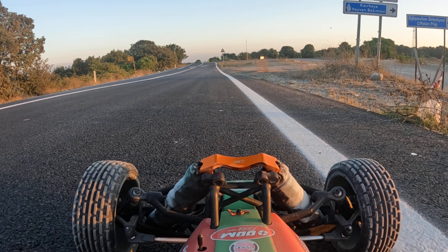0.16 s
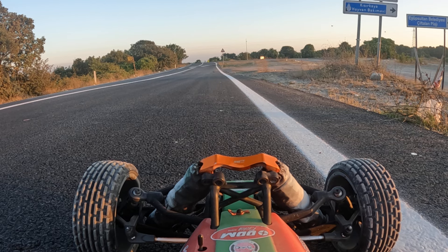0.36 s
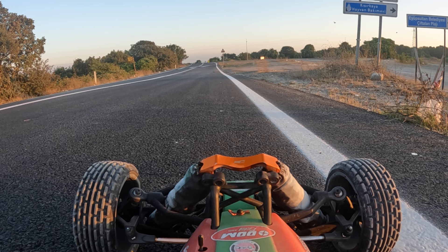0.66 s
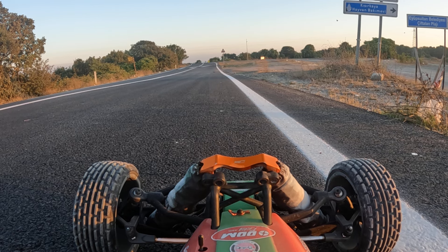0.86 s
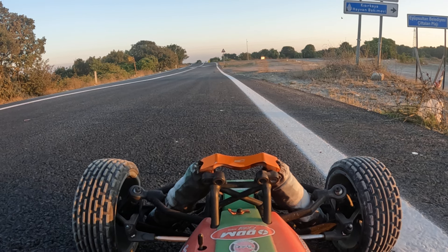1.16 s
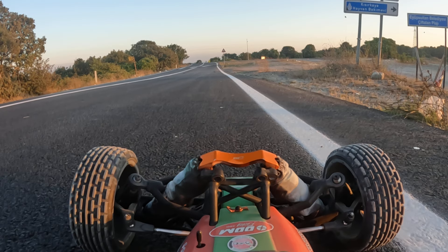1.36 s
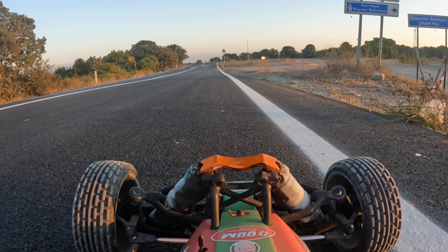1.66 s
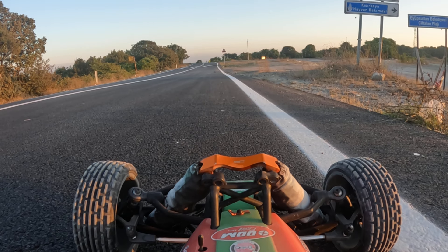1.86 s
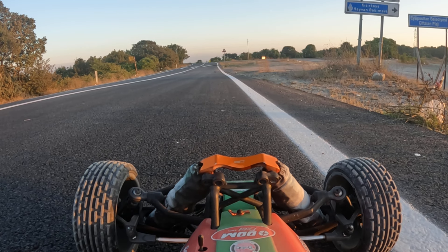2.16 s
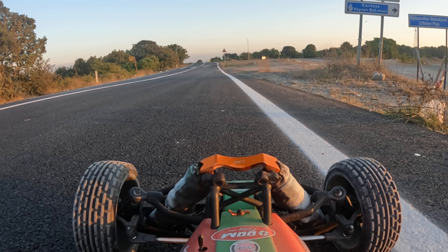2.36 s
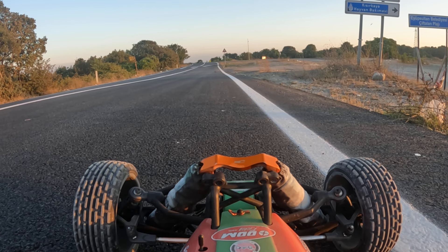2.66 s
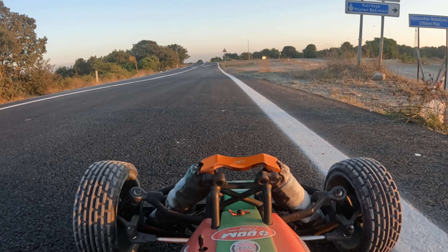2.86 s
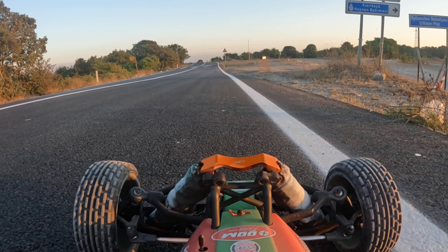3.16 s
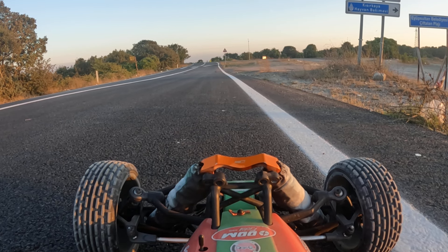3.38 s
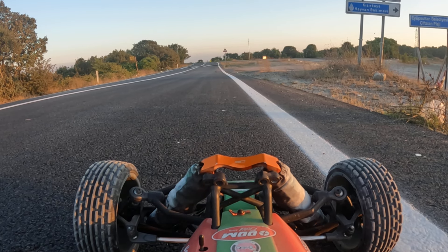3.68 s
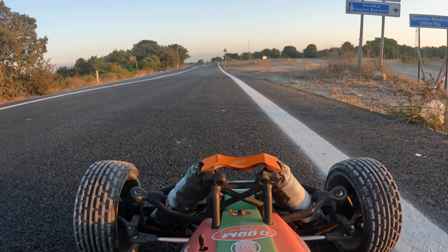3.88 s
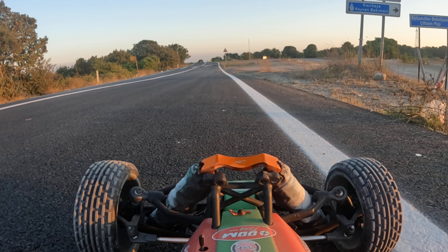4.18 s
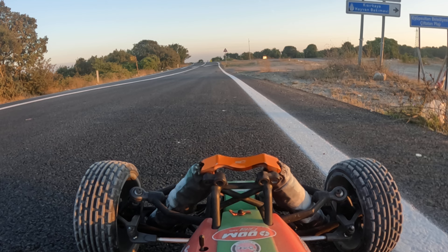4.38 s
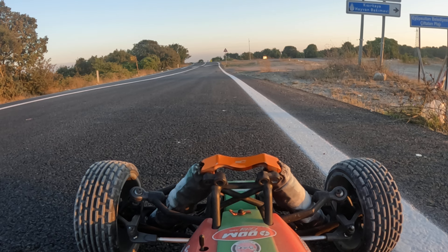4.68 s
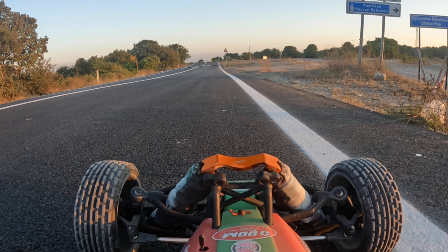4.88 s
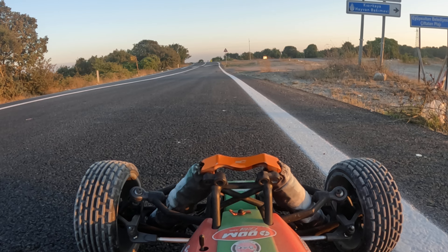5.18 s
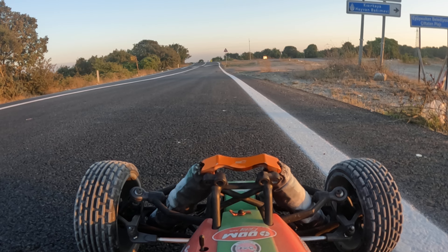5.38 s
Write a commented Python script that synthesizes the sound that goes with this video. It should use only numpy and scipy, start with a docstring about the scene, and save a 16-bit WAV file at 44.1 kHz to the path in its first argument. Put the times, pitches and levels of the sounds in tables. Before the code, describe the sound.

After a few servo twitches, a cord pull starts a small two-stroke engine, which putters unevenly and gives two short revs.

```python
"""Pull-starting a model buggy

A large model buggy on a country road, heard from its chassis over faint far traffic. The steering servo
twitches, tugs on the starter cord jolt the chassis, and one hard pull starts the small two-stroke.
Exhaust puffs drive the silencer and combustion rattles the casing. The engine gathers speed, settles
into a burbling idle that fires every second turn, and twice runs up briefly, clutch shoes scraping."""
import sys
import numpy as np
from scipy import signal
from scipy.fft import rfft, irfft, next_fast_len
from scipy.io import wavfile
from scipy.ndimage import map_coordinates

SR = 44100
rng = np.random.default_rng(int(sys.argv[2]) if len(sys.argv) > 2 else 0)


def generate_wav(sig):
    """Save sig (samples, or channels by samples) to the path in sys.argv[1] as 16-bit PCM at SR."""
    pcm = np.round(np.clip(np.atleast_2d(sig).T, -1, 1) * 32767).astype(np.int16)
    wavfile.write(sys.argv[1], SR, pcm)


N = 243917

# chassis flex spectrum: f/Hz, level/dB
FLEX = [(20, 3), (35, 1.5), (60, 8.5), (90, 9.5), (150, -0.5), (300, -3.5), (700, -58.5)]
# carburettor air spectrum: f/Hz, level/dB
HISS = [(3000, -22), (4500, -5), (5200, -4), (5500, 2), (6100, -4), (6900, -11), (7600, -9), (9000, -21),
        (14000, -45)]
# throttle openings: t/s, length/s
BLIPS = [(4.289, 0.41), (5.329, 0.3)]


def amp(db):
    """Decibels to gain."""
    return 10 ** (np.asarray(db) / 20)


def unit(x):
    """Scale to rms 1."""
    return x / np.sqrt(np.mean(x ** 2) + 1e-20)


def noise():
    """White noise."""
    return rng.standard_normal(N)


def curve(rows):
    """Interpolate (t/s, value) rows to one value per sample."""
    return np.interp(np.arange(N) / SR, *np.transpose(rows))


def coloured(x, spectrum):
    """Minimum-phase filter from (f/Hz, level/dB) rows, steep past the last row."""
    size = 2 * next_fast_len(N // 2 + SR // 4)
    last_hz, last_db = spectrum[-1]
    hz, db = np.transpose([*spectrum, (4 * last_hz, last_db - 80)])
    gain = amp(np.interp(np.log(np.fft.rfftfreq(size, 1 / SR) + 1), np.log(hz), db))
    cepstrum = irfft(np.log(gain + 1e-6))
    cepstrum[1:size // 2] *= 2
    cepstrum[size // 2 + 1:] = 0
    return irfft(rfft(x, size) * np.exp(rfft(cepstrum)))[:N]


def shaped(x, spectrum):
    """Filter to a spectrum, at rms 1."""
    return unit(coloured(x, spectrum))


def impulses(times, sizes):
    """One spike at each time."""
    at = np.clip(np.round(times * SR).astype(int), 0, N)
    return np.bincount(at, sizes, N + 1)[:N]


def bursts(times, sizes, decay_s, rise_s=0.0047):
    """Envelope that swells and decays at each time."""
    decay = signal.lfilter([1], [1, -np.exp(-1 / (decay_s * SR))], impulses(times, sizes))
    pole = np.exp(-1 / (rise_s * SR))
    return signal.lfilter([1 - pole], [1, -pole], decay)


def held(start_s, length_s, attack_s, release_s):
    """Envelope, 0-1: ramp, hold until length_s, decay."""
    t = np.arange(N) / SR - start_s
    return np.clip(t / attack_s, 0, 1) * np.exp(-np.maximum(t - length_s, 0) / release_s)


def add(track, start_s, sound):
    """Mix a sound into the track."""
    part = track[round(start_s * SR):][:len(sound)]
    part += sound[:len(part)]


def contacts(rows, ring_db, crack_db, length_s, release_s, damping, attack_s=0.0011, scatter_db=2):
    """Each contact chatters briefly and rings the chassis modes at random strengths."""
    # chassis and housing modes: f/Hz, level/dB, t60/s
    housing_modes = [(243, -18, .06), (656, -8, 0.12), (850, -10, 0.21), (1000, 2, 0.034),
                     (1143, 8.5, 0.044), (1305, 1, 0.06), (1343, -8.5, 0.058), (1710, -13, 0.065),
                     (2170, -16.5, 0.049), (2530, -21, 0.036), (3100, -24, .035), (3450, -18, 0.057),
                     (4670, -40, .04), (5350, -39.5, 0.036)]
    # chatter: f/Hz, level/dB
    crack_spectrum = [(200, -5), (650, -6.5), (780, -19.5), (1130, 8), (1330, 10.5), (1500, -28.5),
                      (2200, -18), (2800, -27.5), (3450, -19), (3800, -45), (4600, -35.5), (6000, -44),
                      (10000, -76)]
    t = np.arange(SR // 5) / SR
    hz, level_db, t60_s = np.transpose(housing_modes)[:, :, None]
    decay = 1000 ** (-damping * t / t60_s)
    onset = 1 - np.exp(-(t / attack_s) ** 2)
    rings, chatter = np.zeros(N), np.zeros(N)
    for start_s, db in rows:
        size, detune, phase = rng.standard_normal((3, len(housing_modes), 1))
        tones = np.sin(2 * np.pi * (hz * (1 + 0.0029 * detune) * t + phase))
        modes = amp(level_db + scatter_db * size) * decay * tones
        add(rings, start_s, amp(db + ring_db) * modes.sum(0) * onset)
        chatter += amp(db + crack_db) * held(start_s, length_s, attack_s, release_s)
    return rings + np.sqrt(np.mean(chatter ** 2)) * shaped(chatter * noise(), crack_spectrum)


def traffic(level_db=-50):
    """Faint rush of far traffic."""
    # f/Hz, level/dB
    rush_spectrum = [(15, -34), (25, 5), (65, -0.5), (502, 1), (650, -16.5), (842, 7), (1140, 5.5),
                     (1320, -5), (1790, -15.5), (1950, -19), (2180, -18), (2700, -23), (2940, -26),
                     (3150, -17.5), (3420, -17), (3750, -30.5), (4340, -33), (5640, -37), (7500, -45.5),
                     (9550, -74.5)]
    return amp(level_db) * shaped(noise(), rush_spectrum)


def servo():
    """Each twitch of the steering servo is a short buzz of its gears."""
    # t/s, level/dB
    twitches = [(0.1686, -24), (0.1775, -28), (0.1881, -29.5), (0.2798, -27.5), (0.3328, -27.5),
                (0.3634, -30), (0.378, -25.5), (0.404, -28.5), (0.4539, -27), (0.5241, -26.5),
                (0.5525, -24.5), (0.5696, -25), (0.5822, -27), (0.608, -27), (0.6476, -28.5), (0.6858, -18),
                (0.7343, -33.5), (0.7423, -24.5), (0.7712, -22.5), (0.8059, -27.5), (0.9135, -27),
                (0.952, -36), (0.9904, -24.5), (1.005, -25.5), (1.1367, -23.5)]
    return contacts(twitches, ring_db=-13, crack_db=-13, length_s=0.007, release_s=0.002, damping=0.96)


def starter():
    """The slack cord scrapes through its guide, then the pawl knocks on the flywheel."""
    # t/s, level/dB
    cord_scrapes = [(0.646, -63), (0.674, -70), (0.684, -70), (0.77, -67)]
    # f/Hz, level/dB
    scrape_spectrum = [(1500, -6), (3400, 2), (4000, -5), (4550, 1), (5000, -11), (6000, -17), (9000, -37)]
    # t/s, level/dB
    pawl_knocks = [(1.2425, -13.5), (1.2725, -17), (1.288, -12), (1.307, -5), (1.3305, -9), (1.3405, -13),
                   (1.3803, -9.5), (1.447, -12)]
    times, db = np.transpose(cord_scrapes)
    scrapes = bursts(times, amp(db), decay_s=0.032, rise_s=0.002) * shaped(noise(), scrape_spectrum)
    pawl = contacts(pawl_knocks, ring_db=-9.5, crack_db=-13.5,
                    length_s=0.0028, release_s=0.0023, damping=1.3)
    return scrapes + pawl


def chassis(sway_hz=48.8, flex_db=-11):
    """Cord tugs jolt the body shell and leave the buggy swaying and flexing."""
    # t/s, thud level/dB, thud length/s, sway level/dB
    jolts = [(0.683, -29, 0.015, -24), (0.831, -20.5, 0.027, -16), (1.079, -45, 0.012, -23.5),
             (1.161, -26.5, 0.029, -21.5), (1.215, -32, 0.034, -16.5), (1.307, -20, 0.03, -30.5)]
    # f/Hz, level/dB
    thud_spectrum = [(40, -10), (90, 1), (150, 2), (220, -5), (310, 4), (480, -5), (650, 2), (800, -7),
                     (1130, 0), (1500, -19), (2500, -35), (5000, -60)]
    t = np.arange(N) / SR
    knocks = np.zeros(N)
    for start_s, db, length_s, _ in jolts:
        age = t[:SR // 4] / length_s
        add(knocks, start_s, amp(db) * 2 * age * np.exp(-age ** 2))
    times, _, _, sway_db = np.transpose(jolts)
    sway = np.sqrt(2) * np.sin(2 * np.pi * sway_hz * t) + amp(flex_db) * shaped(noise(), FLEX)
    sway *= bursts(times, amp(sway_db), decay_s=0.08, rise_s=0.0089)
    return sway + knocks * shaped(noise(), thud_spectrum)


def engine(start_s=1.237, swell_s=0.13, scatter_db=1, lope=0.53, flex_db=-12, slap_db=-6.5):
    """One cylinder: the piston shakes the chassis; each turn brings a strong or a failed firing."""
    # t/s, f/Hz
    crank_speed = [(1.45, 36.2), (1.6, 44.8), (1.76, 49.3), (1.99, 54.0), (2.84, 62.8), (3.09, 66.4),
                   (3.39, 67.4), (3.49, 66.5), (4.01, 67.1), (4.15, 66.5), (4.3, 66.9), (4.44, 76.8),
                   (4.53, 80.8), (4.82, 68.2), (5.01, 66.3), (5.38, 67.3), (5.43, 70.4), (5.53, 82.1)]
    # failure of every second firing: t/s, share/1
    misfire_share = [(1.3, 0.7), (1.9, 0.42), (2.45, 0.08), (2.85, 0.23), (3.1, 0.6)]
    t = np.arange(N) / SR
    crank_hz = curve(crank_speed)
    misfire = np.clip(curve(misfire_share) - 0.22 * throttle(), 0, 1)
    turns = np.cumsum(crank_hz) / SR
    crank_rad = 2 * np.pi * turns
    turn = np.arange(1, int(turns[-1]) + 1)
    times = np.interp(turn, turns, t)
    half_times = np.interp(turn + 0.5, turns, t)
    imbalance = np.interp(times, t, misfire) * (-1) ** turn
    strength = (1 + 0.99 * imbalance) * amp(scatter_db * rng.standard_normal(len(turn)))
    # skipped firings add a half-rate lope
    shake = -unit(np.cos(crank_rad) + lope * misfire * np.sin(crank_rad / 2))
    shake += amp(flex_db) * shaped(noise(), FLEX)
    shake *= effort(base_db=-18.5, pull_db=6.5, before_pull_db=-1, throttle_db=-3)
    # unburnt fuel turns the dry slap into a rounder, rougher pop
    gas, pops = exhaust(times, strength)
    pipe = amp(4.5 * misfire) * gas + np.sqrt(misfire) * pops
    pipe += (1 - misfire) * amp(slap_db) * slap(times)
    pipe *= effort(base_db=-16, pull_db=7.5, before_pull_db=-1.5, throttle_db=1.5,
                   cold_db=1, clutch_db=-3)
    # misfiring loosens the casing's rattle
    casing = amp(2 * misfire) * clatter(times, 1 + imbalance)
    casing *= effort(base_db=-27.5, pull_db=2, before_pull_db=-1.5, throttle_db=2,
                     cold_db=2.5, overrun_db=4, clutch_db=-5.5)
    gasp = throttle_hiss()
    air = carburettor(times)
    air *= effort(base_db=-70, pull_db=-1, before_pull_db=3, throttle_db=1, cold_db=3, overrun_db=2)
    tones = drone(crank_rad, crank_hz, misfire) + putter(crank_rad, misfire)
    tones *= effort(base_db=-1, pull_db=-4, before_pull_db=-22.5, throttle_db=3)
    run_up = clutch_shoes(times, half_times) + intake(times)
    fade_in = np.clip((t - start_s) / swell_s, 0, 1)
    return fade_in * (shake + pipe + casing + gasp + air + tones + run_up)


def effort(base_db, pull_db, before_pull_db, throttle_db, cold_db=0, overrun_db=0, clutch_db=0):
    """Gain of one engine part through the start and the run-ups."""
    # engine held back just before the hard pull: t/s, length/s, attack/s, release/s
    before_pull = (1.2, 0.057, 0.019, 0.02)
    # hard pull: t/s, length/s, attack/s, release/s
    pull = (1.295, 0.139, 0.013, 0.0063)
    # hard running after the catch: t/s, length/s, attack/s, release/s
    cold_run = (1.53, 0.41, 0.016, 0.1)
    starting_db = before_pull_db * held(*before_pull) + pull_db * held(*pull) + cold_db * held(*cold_run)
    run_up_db = throttle_db * throttle() + overrun_db * overrun() + clutch_db * clutch_grip()
    return amp(base_db + starting_db + run_up_db)


def exhaust(times, strength, jitter_s=0.00043, gas_db=-8.2, puff_db=-9):
    """Each port opening sends rough gas and a puff through the silencer; returns both."""
    # f/Hz, level/dB
    gas_spectrum = [(25, -30.5), (70, -3.5), (160, 1.5), (280, -0.5), (420, 3.5), (580, -2.5), (720, -7),
                    (860, -5), (1400, -35.5), (3000, -102)]
    # f/Hz, level/dB
    puff_spectrum = [(30, -47.5), (65, 0), (130, 14.5), (175, 2.5), (290, -3.5), (400, 4), (460, -13.5),
                     (600, -13.5), (700, -14), (900, -27), (1120, -23), (1450, -34), (3000, -57),
                     (8000, -99.5)]
    puffs = impulses(times + jitter_s * rng.standard_normal(len(times)), strength)
    gas = noise() * (1 + bursts(times, strength, decay_s=0.0096))
    return amp(gas_db) * shaped(gas, gas_spectrum), -amp(puff_db) * shaped(puffs, puff_spectrum)


def slap(times, jitter_s=0.00007, scatter_db=1):
    """Even running gives one dry, ringing slap per turn."""
    # f/Hz, level/dB
    slap_spectrum = [(40, -24), (110, -15), (235, -16.5), (310, -2.5), (400, -2.5), (460, 1), (535, 1.5),
                     (610, 0), (720, -29.5), (1000, -14.5), (1110, -3), (1450, -33), (6000, -84.5)]
    late, size = rng.standard_normal((len(times), 2)).T
    return -shaped(impulses(times + jitter_s * late, amp(scatter_db * size)), slap_spectrum)


def clatter(times, strength, lead_s=0.008, jitter_s=0.00022, scatter_db=2, knock_db=-5):
    """Combustion, ahead of the port opening, knocks the casing and rattles loose parts."""
    # rattle, drive slack: f/Hz, level/dB
    slack_spectrum = [(400, -9), (620, -11), (730, -15.5), (860, -1.5), (950, -5), (1105, 0), (1220, -3),
                      (1320, -5.5), (1450, -14.5), (1600, -12), (1770, -9), (2010, -18.5), (2150, -18.5),
                      (2450, -17.5), (2850, -21.5), (3100, -22.5), (3600, -30), (4050, -30.5),
                      (4450, -40.5), (7000, -65.5)]
    # duller rattle, drive taut: f/Hz, level/dB
    taut_spectrum = [(400, -10), (620, -11), (730, -13), (860, -3), (1105, 0), (1320, -3), (1450, -9),
                     (1750, -8), (2050, -19), (2500, -28), (3200, -32), (4000, -29), (4500, -37),
                     (7000, -60)]
    # strongest casing modes: f/Hz, level/dB
    ring_spectrum = [(500, -37), (1000, -14), (1030, -6.5), (1112, 6.5), (1190, -6.5), (1310, -0.5),
                     (1450, -19), (1650, -16.5), (1760, -8), (2000, -47), (6000, -97)]
    size, late = rng.standard_normal((len(times), 2)).T
    blows = strength * amp(scatter_db * size)
    shaking = unit(noise() * (1 + bursts(times - lead_s, blows, decay_s=0.021)))
    taut = np.clip(clutch_grip(), 0, 1)
    rattle = coloured(shaking * (1 - taut), slack_spectrum) + coloured(shaking * taut, taut_spectrum)
    knocks = impulses(times - lead_s + jitter_s * late, blows)
    return unit(rattle) + amp(knock_db) * shaped(knocks, ring_spectrum)


def carburettor(times):
    """Thin hiss of air with an uneven spit each turn."""
    spits = amp(7 + 3.8 * rng.standard_normal(len(times)))
    flow = noise() * (1 + bursts(times, spits, decay_s=0.0013, rise_s=0.0003))
    return shaped(flow, HISS)


def drone(crank_rad, crank_hz, misfire, lag_rad=0.7, misfire_db=-6):
    """Low crank orders swell through the silencer's resonances and weaken with misfiring."""
    # f/Hz, level/dB
    silencer_response = [(92, -25.5), (106, -22), (115, -26), (124, -20), (134, -26.5), (148, -24.5),
                         (159, -22.5), (172, -32), (187, -21.5), (200, -31.5), (214, -21.5), (235, -29),
                         (250, -28), (270, -30.5), (310, -30)]
    hz, db = np.transpose(silencer_response)
    tones = sum(np.cos(k * crank_rad - lag_rad) * amp(np.interp(k * crank_hz, hz, db)) for k in (2, 3, 4))
    return -np.sqrt(2) * amp(misfire_db * misfire) * tones


def putter(crank_rad, misfire, lag_rad=0.7):
    """Firing every second turn sounds the pipe between the crank orders."""
    # crank order/1, level/dB
    half_orders = [(2.5, -27), (3.5, -31), (4.5, -33), (5.5, -31.5)]
    return -np.sqrt(2) * misfire * sum(amp(db) * np.cos(k * crank_rad - lag_rad) for k, db in half_orders)


def cord(grain_db=4, grain_hz=260, squeal_db=-12, rasp_db=-24.5):
    """The braid snatches taut and slips unevenly: it squeals in its guide, then rasps."""
    # t/s, level/dB
    jerks = [(1.2425, -24), (1.3305, -17.5), (1.3465, -27), (1.3565, -19), (1.3615, -22), (1.3675, -19),
             (1.3735, -22), (1.3815, -12.5), (1.3974, -23), (1.407, -22), (1.4205, -19), (1.4245, -20),
             (1.4335, -20), (1.4473, -15.5)]
    # f/Hz, level/dB
    jerk_spectrum = [(300, -4), (750, -4), (1200, 5), (1500, -3), (1800, 1), (2900, -7), (3700, -14),
                     (4400, -25), (6000, -35), (7000, -46), (14000, -65)]
    # t/s, length/s, attack/s, release/s
    squeal_span = (1.277, 0.038, 0.03, 0.005)
    # f/Hz, level/dB
    squeal_spectrum = [(500, -17), (880, -9.5), (1020, -6.5), (1120, 2), (1220, -4), (1320, -19),
                       (1500, -28), (2500, -45), (6000, -88)]
    # t/s, length/s, attack/s, release/s
    rasp_span = (1.338, 0.073, 0.07, 0.011)
    # f/Hz, level/dB
    rasp_spectrum = [(150, 1), (330, 8), (600, 4), (750, -4), (1200, 0), (1500, -4), (1700, -2), (2000, -6),
                     (2900, -6), (4200, -19), (6000, -30), (8500, -35), (10000, -44), (15000, -54)]
    knots = rng.standard_normal(int(N * grain_hz / SR) + 4)
    grip = amp(grain_db * map_coordinates(knots, [np.arange(N) * grain_hz / SR]))
    times, db = np.transpose(jerks)
    snatches = bursts(times, amp(db), decay_s=0.002, rise_s=0.0008) * shaped(noise(), jerk_spectrum)
    rasp = amp(rasp_db) * held(*rasp_span) * shaped(noise() * grip, rasp_spectrum)
    squeal = amp(squeal_db) * held(*squeal_span) * shaped(noise() * grip, squeal_spectrum)
    return snatches + rasp + squeal


def crackles():
    """Thin, sharp snaps at the height of the pull."""
    # t/s, level/dB
    snaps = [(1.340, -42), (1.3665, -39), (1.372, -41), (1.377, -37.5), (1.382, -35), (1.425, -42)]
    times, db = np.transpose(snaps)
    return impulses(times, amp(db))


def loose_part(trim_db=-7):
    """A loose part hits the chassis now and then."""
    # t/s, level/dB
    hits = [(1.5945, -17.5), (1.8694, -18.5), (1.9607, -22), (2.1296, -21), (2.2698, -29), (2.8215, -15.5),
            (2.9434, -21.5), (3.05, -17.5), (3.0825, -34), (3.2086, -31), (3.4379, -32), (3.692, -23),
            (4.275, -21.5), (5.1125, -28)]
    # f/Hz, level/dB
    hit_spectrum = [(600, -12), (1110, 7), (1320, 2), (1480, -8), (1780, 1), (2020, -9), (2600, -8),
                    (4000, -21), (4600, -34), (5600, -37), (8000, -50), (12000, -75)]
    times, db = np.transpose(hits)
    return bursts(times, amp(db + trim_db), decay_s=0.016, rise_s=0.0016) * shaped(noise(), hit_spectrum)


def intake(times, steady_flow=0.22, growl_db=-28.5):
    """Under load the intake growls, one gulp per turn."""
    # t/s, gain/1
    growl_strength = [(3.85, 0), (4.02, 2.2), (4.25, 1.6), (4.36, 2.1), (4.6, 3.5), (4.8, -1), (5.34, 0.5),
                      (5.42, 2.3)]
    # f/Hz, level/dB
    growl_spectrum = [(60, -10), (120, 1.5), (170, 10.5), (240, 2.5), (310, -4.5), (420, -13.5),
                      (900, -51.5)]
    gulps = steady_flow + bursts(times, np.ones(len(times)), decay_s=0.005)
    return amp(growl_db) * curve(growl_strength) * shaped(noise() * gulps, growl_spectrum)


def throttle():
    """Throttle opening, 0-1."""
    return sum(held(start_s, length_s, attack_s=0.07, release_s=0.032) for start_s, length_s in BLIPS)


def throttle_hiss(lag_s=0.059, level_db=-65):
    """The carburettor hisses briefly just after the throttle opens."""
    flow = sum(held(start_s + lag_s, length_s=0.07, attack_s=0.02, release_s=0.03) for start_s, _ in BLIPS)
    return amp(level_db) * flow * shaped(noise(), HISS)


def clutch_grip(lag_s=0.072):
    """Shoe contact with the drum, 0-1, lagging the throttle."""
    return sum(held(start_s + lag_s, length_s - lag_s, attack_s=0.19, release_s=0.083)
               for start_s, length_s in BLIPS)


def clutch_shoes(times, half_times, drag_db=-26.5, tap_db=-42.3, scatter_db=2.6, jitter_s=0.00022):
    """Two shoes tap and scrape their drum in turn."""
    # f/Hz, level/dB
    drag_spectrum = [(400, -25), (650, -8), (800, 2), (920, 1), (1150, -12), (1300, -7), (1480, -13),
                     (1650, -8), (2050, -21), (2800, -34), (4500, -38), (7500, -52), (12000, -80)]
    # f/Hz, level/dB
    tap_spectrum = [(1500, -30), (2100, -16), (2550, -1), (3000, 0), (3350, -10), (4200, -24), (7500, -36),
                    (12000, -70)]
    late, size = rng.standard_normal((2 * len(times), 2)).T
    touches_s = np.append(times, half_times) + jitter_s * late
    sizes = amp(scatter_db * size)
    friction = noise() * bursts(touches_s, sizes, decay_s=0.0029, rise_s=0.0014)
    drag = amp(drag_db) * shaped(friction, drag_spectrum)
    taps = amp(tap_db) * shaped(impulses(touches_s, sizes), tap_spectrum)
    return clutch_grip() * (drag + taps)


def overrun(lead_s=0.029):
    """Envelope, 0-1: the throttle closes and the drive goes slack."""
    return sum(held(start_s + open_s - lead_s, length_s=0.13, attack_s=0.023, release_s=0.014)
               for start_s, open_s in BLIPS)


def scene():
    """Mono mix at the chassis."""
    buggy = engine() + loose_part() + servo() + starter() + cord() + crackles() + chassis()
    return (buggy + traffic())[None]


def record(dry, ceiling=0.85, top_hz=15100):
    """Soft peak limit, then a steep low-pass."""
    rounded = dry / (1 + (dry / ceiling) ** 8) ** (1 / 8)
    return signal.sosfilt(signal.butter(16, top_hz, fs=SR, output="sos"), rounded)


dry = scene()
out = record(dry)
generate_wav(out)
```